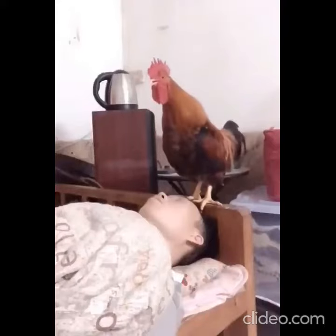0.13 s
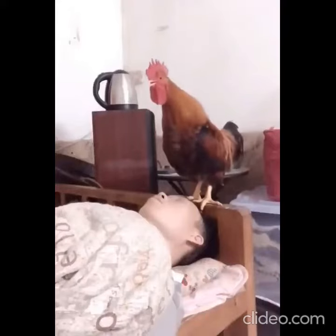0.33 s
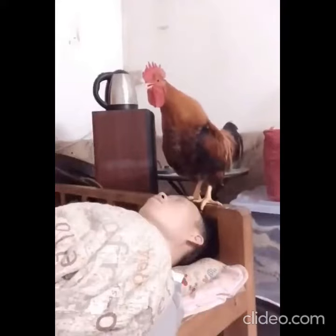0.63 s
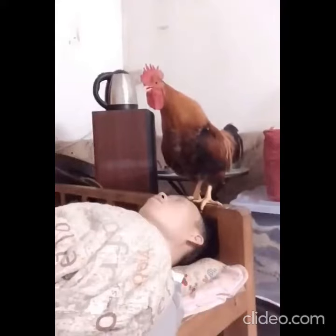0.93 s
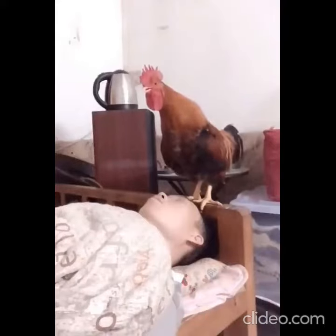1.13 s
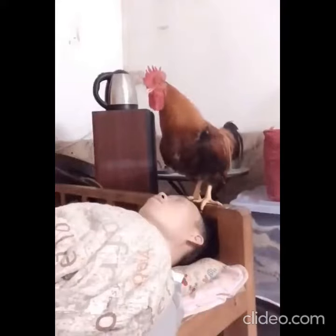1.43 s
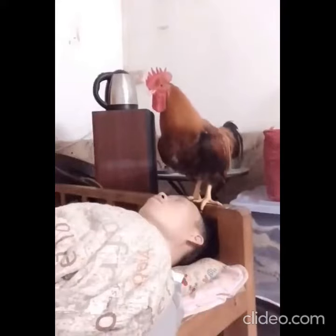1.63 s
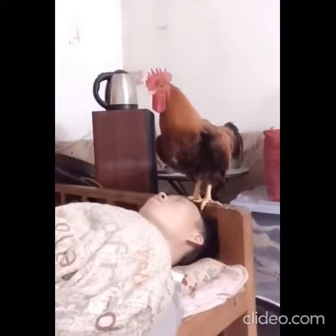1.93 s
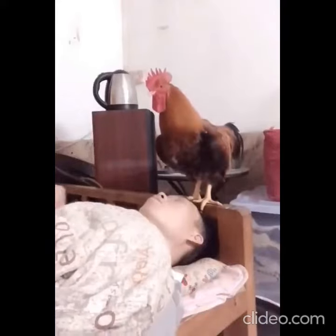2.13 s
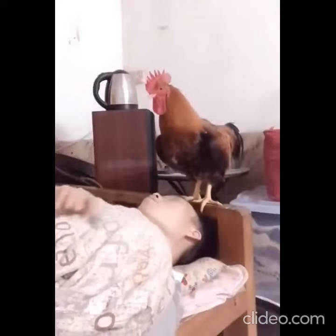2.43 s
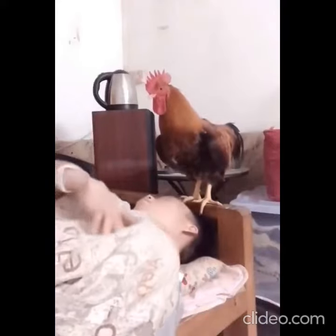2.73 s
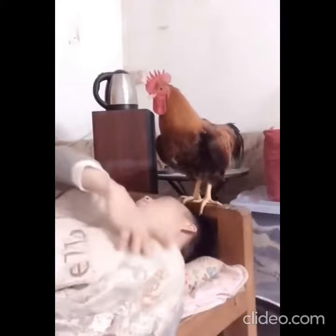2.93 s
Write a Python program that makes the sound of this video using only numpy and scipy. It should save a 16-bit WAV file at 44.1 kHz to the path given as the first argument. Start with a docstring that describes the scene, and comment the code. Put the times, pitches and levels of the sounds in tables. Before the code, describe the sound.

One loud, close rooster crow echoes off the walls of a small room, going from a hoarse opening to a held note and a falling gargle. The bird wheezes faintly, then bedding rustles softly over a low room rumble.

```python
"""A rooster's rasping opening syllables, close to the microphone in a small bare room. The single crow
goes on into a long clear note with a half-pitch undertone, then a drop and a gargle: pulses of the syrinx,
shaped by throat and beak and echoed by the walls. The bird draws air with a faint wheeze; bedding rustles.
The recorder's gain control holds the crow level and lets the room's rumble and hum come up afterwards."""
import sys
import numpy as np
from scipy import signal
from scipy.fft import rfft, irfft, next_fast_len
from scipy.io import wavfile
from scipy.ndimage import uniform_filter1d, minimum_filter1d

SR = 44100
rng = np.random.default_rng(int(sys.argv[2]) if len(sys.argv) > 2 else 0)


def digitize_waveform(pressure):
    """Quantize a signal to 16-bit integers and store it at the path in sys.argv[1].

    Rows of a 2-D input are taken as channels; values are limited to [-1, 1].
    """
    field = np.atleast_2d(pressure).T
    bounded = np.clip(field, -1, 1)
    quanta = np.round(bounded * 32767).astype(np.int16)
    wavfile.write(sys.argv[1], SR, quanta)


N = 136710
T = np.arange(N) / SR
BAND_LIMIT_HZ = 15450


def amp(db):
    """Decibels to gain."""
    return 10 ** (np.asarray(db) / 20)


def unit(x):
    """Scales to rms 1."""
    return x / np.sqrt(np.mean(x ** 2) + 1e-20)


def curves(rows):
    """Each column of a timed table, sample by sample."""
    times, *columns = np.transpose(rows)
    return [np.interp(T, times, column) for column in columns]


def value_at(spectrum, hz):
    """A spectrum's value at given frequencies."""
    known_hz, values = np.transpose(spectrum)
    return np.interp(np.log(hz + 1), np.log(known_hz), values)


def colour(x, spectrum):
    """Filters by a spectrum in dB."""
    size = next_fast_len(N + 8192)
    gain = amp(value_at(spectrum, np.fft.rfftfreq(size, 1 / SR)))
    return irfft(rfft(x, size) * gain, size)[:N]


def drift(hz):
    """Random motion of rms 1, up to a given speed."""
    rolloff = 1 + (np.fft.rfftfreq(N, 1 / SR) / hz) ** 4
    return unit(irfft(rfft(rng.standard_normal(N)) / rolloff, N))


def phase_of(hz):
    """Running phase of a changing frequency, in radians."""
    return 2 * np.pi * np.cumsum(hz) / SR


# The crow, close by (time [s], pitch [Hz], effort [dB], overtone boost [dB], roughness [0 = smooth])
CROW_GESTURE = [(0, 599, -2.5, -5.5, 0.78), (.092, 588, -20, -1.5, 0.49), (.104, 619.8, 1, 7, 0.91),
                (.17, 642.6, 1, 1, 0.65), (.24, 681.4, 0.5, -1, 0.43), (.3, 763, -6, 10, 0.42),
                (.325, 749.3, 5, 1, 0.11), (.345, 591.5, -7.5, -5, 0.48), (.395, 607.5, 0, 3.5, 0.47),
                (.43, 654.4, -1.5, 0, 0.56), (.53, 700, 1.5, 2, 0.62), (.61, 667, 0.5, 4.5, 0.51),
                (.70, 649, 0, -3.5, 0.47), (.78, 627.3, 12.5, 0.5, 0.27), (.82, 572.1, -2, 3.5, 0.68),
                (.89, 446.2, -0.5, -3, 0.68), (.945, 483.1, 3, 0, 0.55), (1.0, 583.2, 8, -3, 0.39),
                (1.016, 614.2, -7.5, 10, 0.04), (1.095, 614.4, 8, -5, 0.08), (1.12, 670, -6, 1.5, 0.08),
                (1.2, 685.2, -2.5, 7, 0.29), (1.28, 682.1, -2, 2.5, 0.16), (1.46, 683.4, 5.5, 5, 0.07),
                (1.62, 676.8, -3.5, 0, 0.13), (1.70, 673.3, -5.5, 5.5, 0.16), (1.78, 656.5, -11.5, 4, 0.17),
                (1.895, 643, 2.5, -6, 0), (1.912, 578.8, 2, -3, 0.03), (2.04, 568, -3.5, 0.5, 0.16),
                (2.08, 543, -1, -3.5, 0.22), (2.13, 531.2, -12.5, 5, 0.56), (2.18, 520.2, -21, -3.5, 0.79),
                (2.25, 501.5, -59, 6, 1.1)]
# Period doubling on the long note (time [s], strength [0-1])
PERIOD_DOUBLING = [(1.11, 0), (1.15, 1), (1.83, 1), (1.88, 0)]
# Half-pitch lines, relative to the overtones (frequency [Hz], level [dB])
UNDERTONE_SPECTRUM = [(340, -23), (1030, -16), (1700, -13), (2400, -8), (3100, 2), (15000, -2)]
def syrinx(level_db=-4, jitter_depth=0.1255, wobble_depth=0.00121, rattle_hz=51.6, air_share=0.35):
    """The bird's voice source pulses: jittered, throbbing and breathy where it is rough."""
    hz, effort_db, boost_db, rough = curves(CROW_GESTURE)
    rough = np.maximum(rough, 0)
    jitter = jitter_depth * rough ** 1.5 * drift(hz=290.5)
    wobble = wobble_depth * drift(hz=22.4)
    phase = phase_of(hz * (1 + jitter + wobble))
    doubling, = curves(PERIOD_DOUBLING)
    overtones = np.zeros(N)
    for k in range(1, 34):
        in_band = np.clip((BAND_LIMIT_HZ - k * hz) / hz, 0, 1)
        half_gain = doubling * amp(value_at(UNDERTONE_SPECTRUM, (k - .5) * hz))
        overtones += in_band * (np.cos((k + 1) * phase) + half_gain * np.cos((k - .5) * phase))
    opening = (1 + np.cos(phase)) / 2  # one puff of air per pulse
    air = air_share * rough ** 2 * np.sqrt(SR / hz) * opening * rng.standard_normal(N)
    rattle_db = 6 * rough * np.sin(phase_of(rattle_hz * (1 + 0.3416 * drift(rattle_hz))))
    pulses = np.cos(phase) + amp(boost_db) * (overtones + air)
    gate = np.minimum(T / .004, 1) * (T < CROW_GESTURE[-1][0])
    return amp(level_db + effort_db + rattle_db) * pulses * gate


# Lift or cut of the crow's treble (time [s], level [dB])
TREBLE_LIFT = [(.13, -6), (.36, -5.5), (.46, 1.5), (.66, 1.5), (.88, -5.5), (1.0, -1), (1.6, -3), (1.7, 5),
               (1.96, 9.5), (2.13, -6)]
def brightness(voice, above_hz=6700):
    """The treble rises and falls through the crow."""
    lift_db, = curves(TREBLE_LIFT)
    treble = signal.sosfiltfilt(signal.butter(2, above_hz, "high", fs=SR, output="sos"), voice)
    return voice + (amp(lift_db) - 1) * treble


def ring(x, hz, width):
    """One narrow resonance of gain 1, applied twice for steep sides."""
    b, a = signal.iirpeak(hz, hz / width, SR)
    return signal.lfilter(b, a, signal.lfilter(b, a, x))


# Throat and beak while rasping (frequency [Hz], level [dB])
RASPING_THROAT = [(150, -26.5), (340, -14), (480, -18), (640, 1), (760, -3.5), (1000, -8.5), (1350, -13),
                  (1900, -10), (2120, -18.5), (2350, -15), (2900, -31.5), (3350, -18.5), (3800, -36),
                  (4150, -55), (4450, -23.5), (4750, -24.5), (5200, -40.5), (5550, -53), (5900, -35),
                  (6250, -44), (6900, -32), (7800, -28), (8300, -37.5), (8900, -31.5), (10000, -40),
                  (12000, -48), (17000, -50)]
# Narrow resonances of the rasp (frequency [Hz], width per pass [Hz], level [dB])
RASP_RESONANCES = [(690.6, 168, -11), (1307.4, 26, -8), (1534, 110, -11), (1841, 49, -13), (2352, 60, -12)]
# Throat and beak from the clear note on (frequency [Hz], level [dB])
CLEAR_THROAT = [(150, -24), (340, 4), (560, 1.5), (690, 8.5), (900, -3.5), (1150, -6), (1235, -12.5),
                (1300, 0), (1370, 0), (1700, 1), (2050, -11.5), (2400, -24), (2740, -32), (3080, -22.5),
                (3425, -33.5), (3770, -46), (4110, -52.5), (4450, -40), (4800, -60.5), (5140, -40.5),
                (5480, -19), (5820, -32.5), (6165, -41), (6500, -25), (6900, -43), (7550, -35),
                (8200, -55.5), (9000, -38.5), (10300, -50), (11000, -43), (12700, -48), (14000, -61),
                (15200, -44), (17000, -60)]
def throat(voice, clears_at_s=1.026, clears_over_s=0.041):
    """Throat and beak filter the pulses, changing from a rasping shape to a clear one."""
    clear = np.clip((T - clears_at_s) / clears_over_s + .5, 0, 1)
    rasp = voice * (1 - clear)
    ringing = sum(amp(db) * ring(rasp, hz, width) for hz, width, db in RASP_RESONANCES)
    return colour(rasp, RASPING_THROAT) + ringing + colour(voice * clear, CLEAR_THROAT)


# Decay of the small bare room (frequency [Hz], time to fall 60 dB [s])
ROOM_DECAY = [(150, 0.9), (600, 0.54), (2000, 0.47), (5500, 0.5), (14000, 0.14)]
def wall_echoes(first_echo_s=0.00595):
    """Dense echoes from bare walls, each band dying at its own speed."""
    taps = rng.standard_normal(SR) * (T[:SR] > first_echo_s)
    hz, t, bands = signal.stft(taps, SR, nperseg=256)
    t60 = np.maximum(value_at(ROOM_DECAY, hz), .05)[:, None]
    equal_energy = np.sqrt(2 * np.log(1000) / t60 / SR)
    return signal.istft(bands * amp(-60 * t / t60) * equal_energy, SR, nperseg=256)[1]


def room(direct, patterns=3, sway_hz=0.903, wet_db=1):
    """Direct sound at the microphone, plus echo patterns that take turns as the bird's head moves."""
    turns = np.array([1 + np.cos(2 * np.pi * (sway_hz * T + k / patterns)) for k in range(patterns)])
    shares = turns / np.linalg.norm(turns, axis=0)
    echoes = sum(signal.fftconvolve(direct * share, wall_echoes())[:N] for share in shares)
    return direct + amp(wet_db) * echoes


# The room's rumble at the microphone (frequency [Hz], relative level [dB])
RUMBLE_SPECTRUM = [(15, -34), (25, -12.5), (64, 3), (131, -10), (286, -15), (363, -39), (427, -24),
                   (637, -10), (790, -28.5), (1310, -17), (1420, -23), (4870, -34), (15000, -56)]
# Lines of hum in the room (frequency [Hz], relative level [dB])
HUM_LINES = [(53.8, -48), (80.7, -62), (166.9, -51), (559.9, -74), (683.7, -55)]
def room_tone(rumble_db=-47.5, hum_db=-4, waver_hz=2.87):
    """Low rumble and a wavering hum lie under everything from the start."""
    hum = sum(amp(db) * np.sin(phase_of(hz + waver_hz * drift(hz=7.1))) for hz, db in HUM_LINES)
    rumble = unit(colour(rng.standard_normal(N), RUMBLE_SPECTRUM))
    return amp(rumble_db) * rumble + amp(hum_db) * hum


# A thin whistle entering with the clear note, free of echo (time [s], level [dB])
WHISTLE_LEVEL = [(.97, -110), (1.01, -31), (1.4, -27), (1.9, -30), (2.12, -37), (2.6, -110)]
def whistle(hz=9131, scatter=.0015):
    """A faint high line that keeps its pitch."""
    level_db, = curves(WHISTLE_LEVEL)
    return amp(level_db) * np.sin(phase_of(hz * (1 + scatter * drift(hz=194.7))))


def swell(start_s, length_s, db, rise_share=0.068):
    """A quick rise and a slower fall."""
    progress = (T - start_s) / length_s
    ramps = np.minimum(progress / rise_share, (1 - progress) / (1 - rise_share))
    return amp(db) * np.sqrt(np.clip(ramps, 0, 1))


# The bird's intake of air, close by (frequency [Hz], relative level [dB])
WHEEZE_SPECTRUM = [(300, -7), (600, -2), (1000, -15.5), (1550, -30), (1680, 16), (1820, -12), (2700, -20),
                   (4000, -15), (5200, -22), (7200, -21.5), (8300, -31), (15000, -38)]
def wheeze():
    """Air drawn back through the bird's narrow throat as the crow ends."""
    breath = unit(colour(rng.standard_normal(N), WHEEZE_SPECTRUM))
    return swell(start_s=2.22, length_s=0.23, db=-35.5) * breath


# Strokes over the bedding in the same room (start [s], length [s], relative level [dB])
BEDDING_STROKES = [(2.606, 0.15, -48), (2.766, 0.34, -54.5)]
# Colour of the rubbing cloth (frequency [Hz], relative level [dB])
BEDDING_SPECTRUM = [(100, -10), (400, 12.5), (1100, 6.5), (2000, -2.5), (3000, 2.5), (4500, -7.5),
                    (6200, -11), (8000, -31), (15000, -33)]
def bedding(level_db=-3, clump_db=1.5):
    """Cloth rubs in small clumps of grains."""
    grains = rng.standard_normal(N) * amp(clump_db * drift(hz=121.7))
    strokes = sum(swell(*stroke) for stroke in BEDDING_STROKES)
    return amp(level_db) * strokes * unit(colour(grains, BEDDING_SPECTRUM))


def scene():
    """Everything in the room, at one microphone close to the bird."""
    crow = throat(brightness(syrinx()))
    return (room(crow + wheeze() + bedding()) + whistle() + room_tone())[None]


def record(dry):
    """The recorder: gain control that ducks quickly and recovers slowly, peak limiter, band limit."""
    threshold_db, ratio, release_db_per_s = -18, 4.17, 36
    start_over_db, makeup_db, ceiling = 9.5, 5, .8
    span = int(0.015 * SR)  # level is sensed over 15 ms
    power_db = 10 * np.log10(abs(uniform_filter1d(dry[0] ** 2, span)) + 1e-12)
    release_db = T * release_db_per_s
    peak_db = np.maximum.accumulate(power_db + release_db - threshold_db)
    over_db = np.maximum(np.maximum(peak_db, start_over_db) - release_db, 0)  # starts already ducked
    held = dry * amp(makeup_db - (1 - 1 / ratio) * uniform_filter1d(over_db, span))
    limiter_gain = minimum_filter1d(ceiling / np.maximum(abs(held), ceiling), size=400)
    limited = held * uniform_filter1d(limiter_gain, size=400)
    lowpass = signal.firwin(511, BAND_LIMIT_HZ, window=("kaiser", 9), fs=SR)
    return signal.oaconvolve(limited, lowpass[None], "same")


dry = scene()
out = record(dry)
digitize_waveform(out)
```